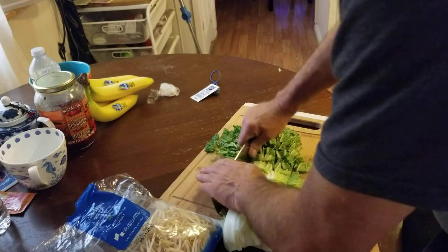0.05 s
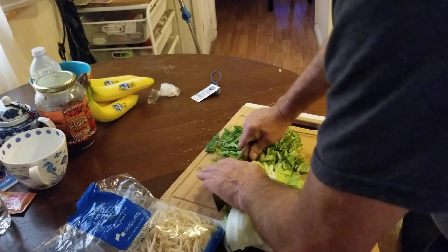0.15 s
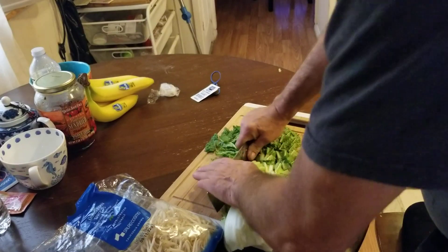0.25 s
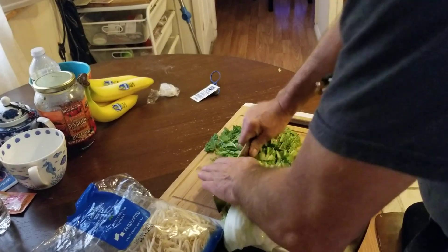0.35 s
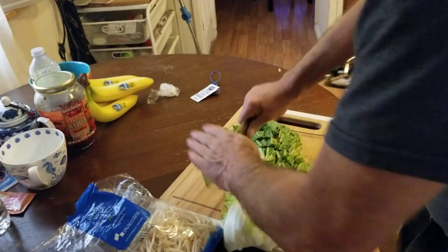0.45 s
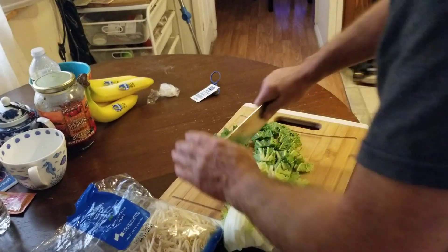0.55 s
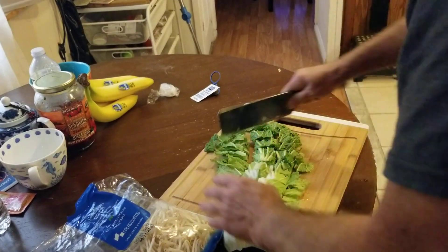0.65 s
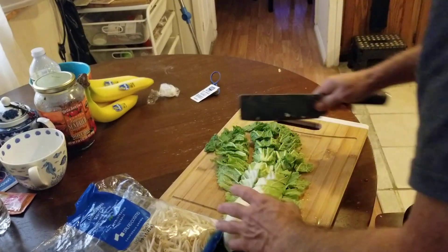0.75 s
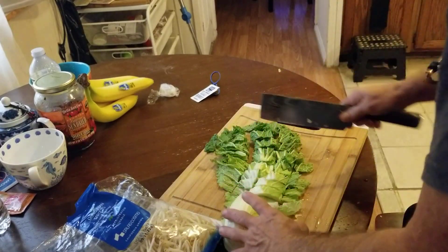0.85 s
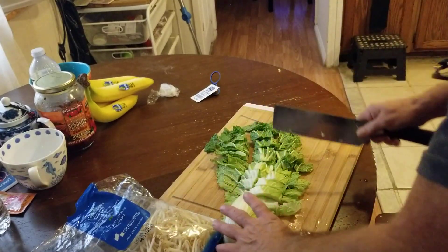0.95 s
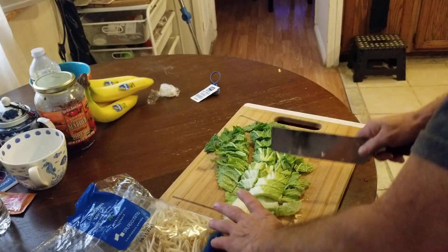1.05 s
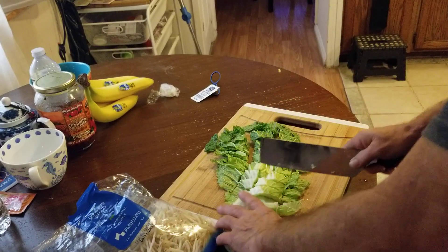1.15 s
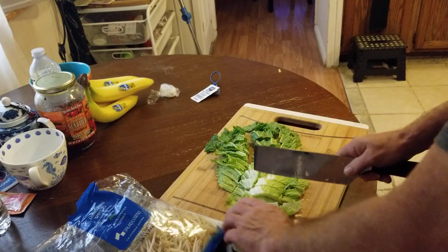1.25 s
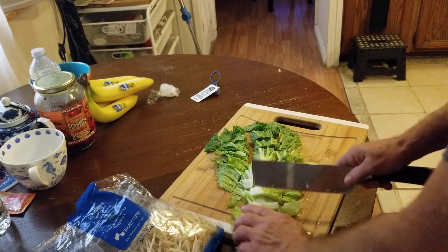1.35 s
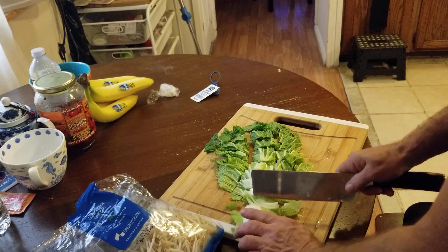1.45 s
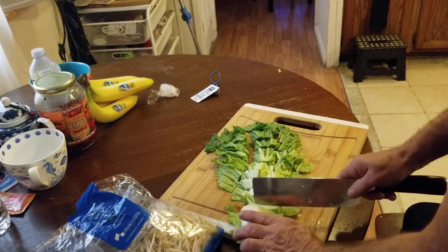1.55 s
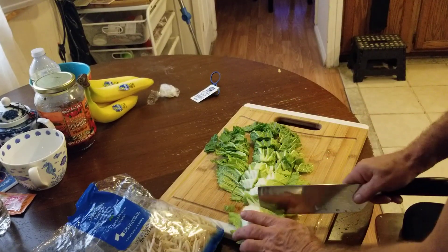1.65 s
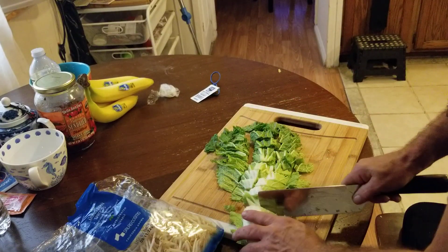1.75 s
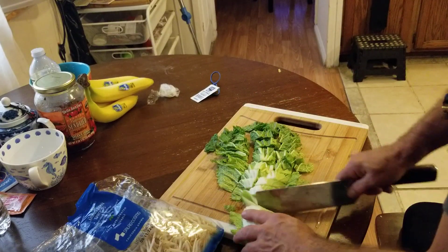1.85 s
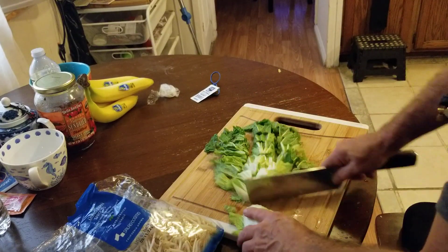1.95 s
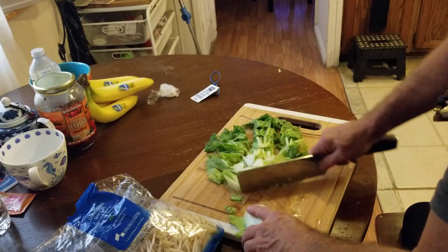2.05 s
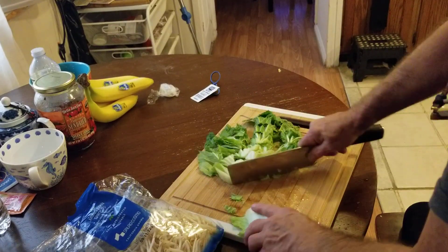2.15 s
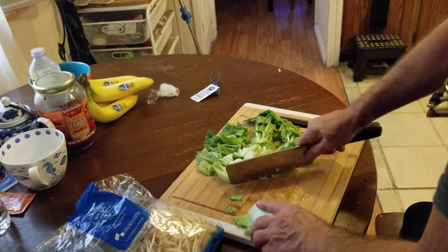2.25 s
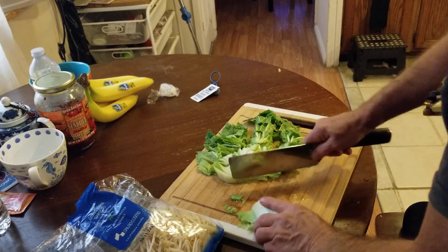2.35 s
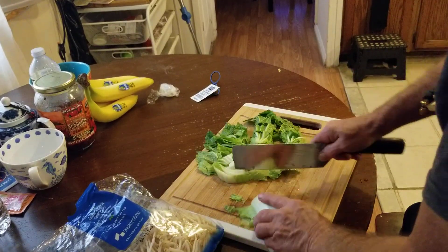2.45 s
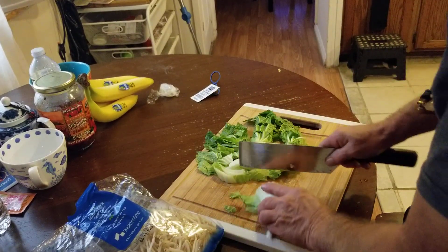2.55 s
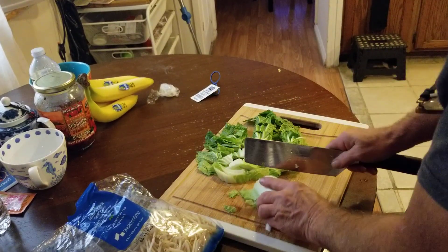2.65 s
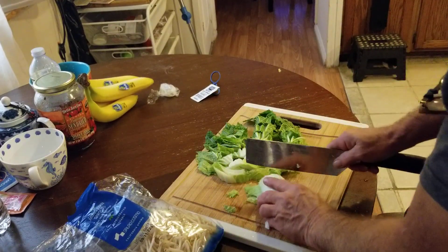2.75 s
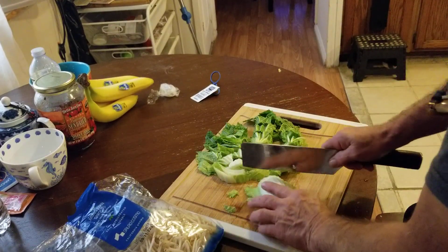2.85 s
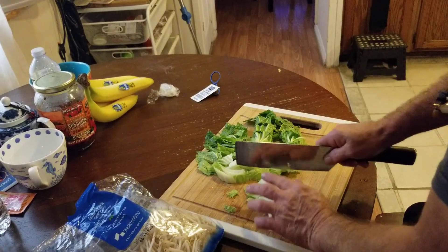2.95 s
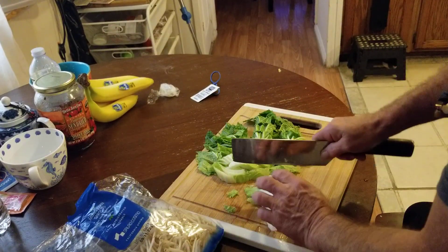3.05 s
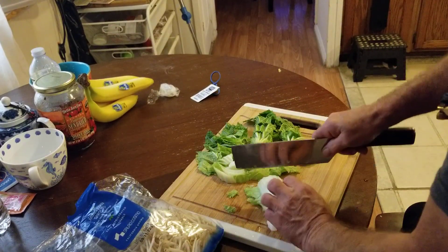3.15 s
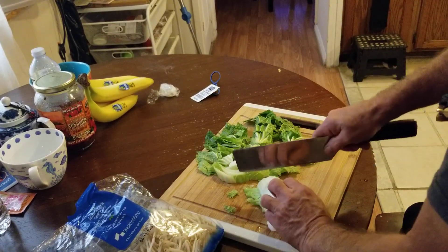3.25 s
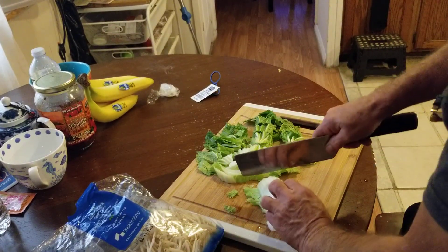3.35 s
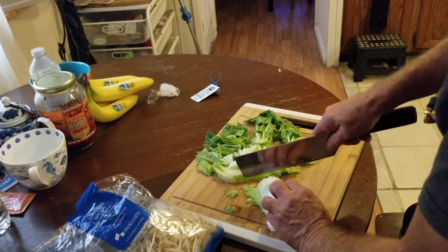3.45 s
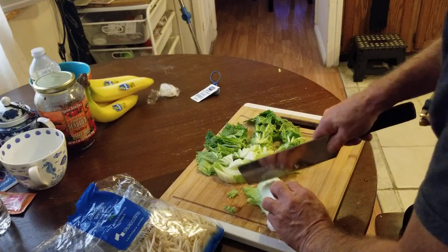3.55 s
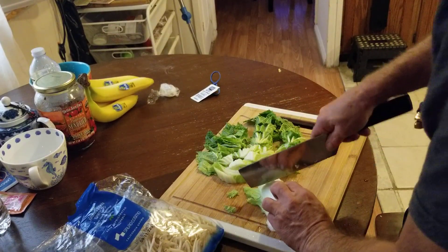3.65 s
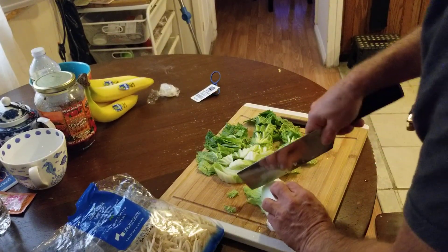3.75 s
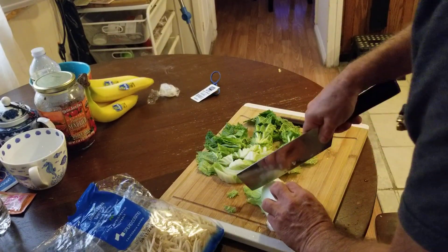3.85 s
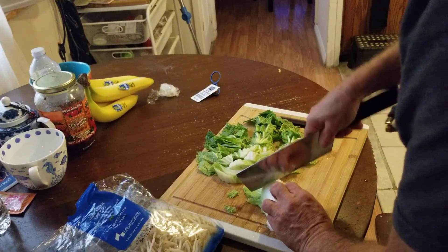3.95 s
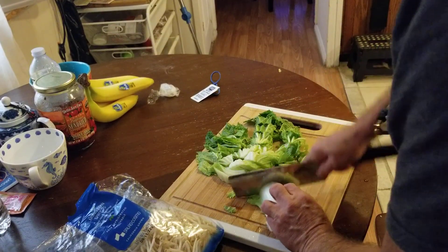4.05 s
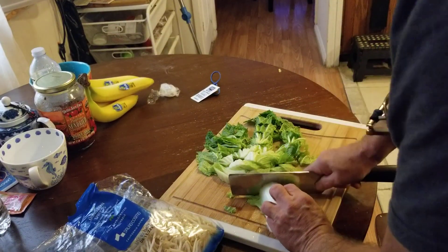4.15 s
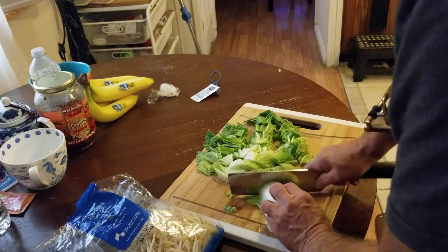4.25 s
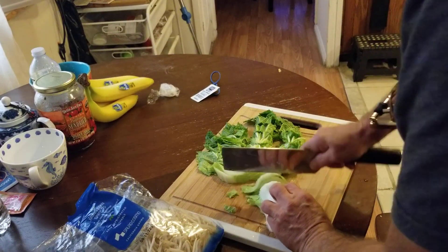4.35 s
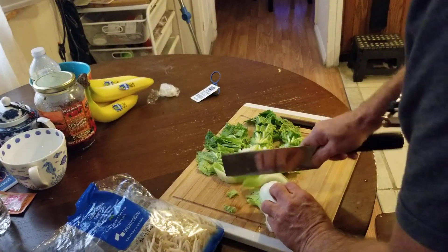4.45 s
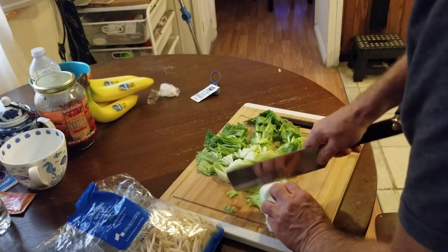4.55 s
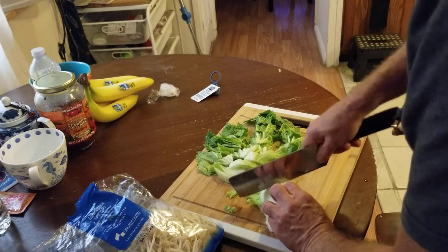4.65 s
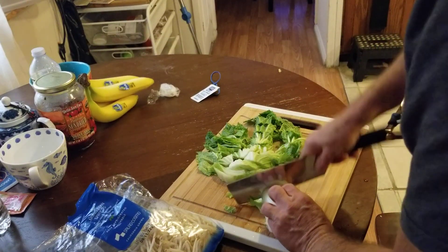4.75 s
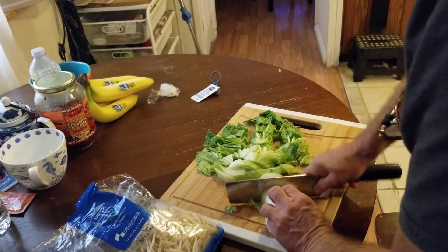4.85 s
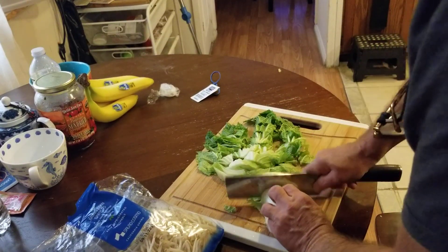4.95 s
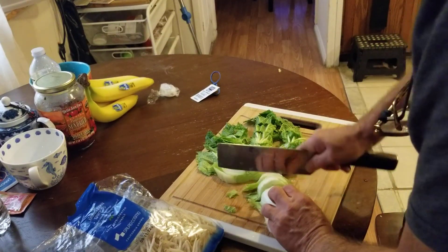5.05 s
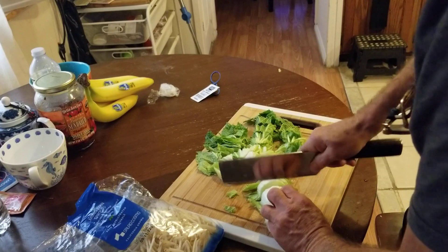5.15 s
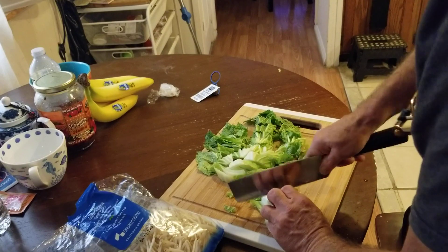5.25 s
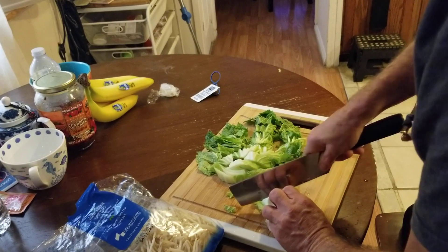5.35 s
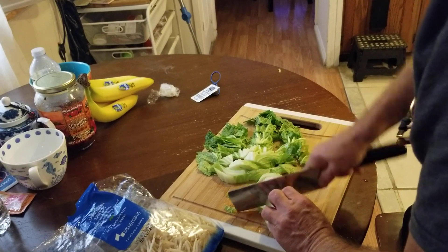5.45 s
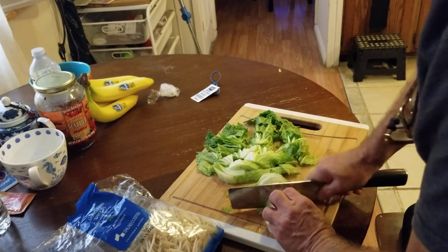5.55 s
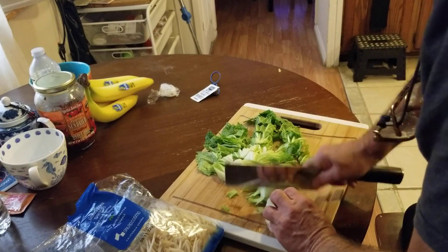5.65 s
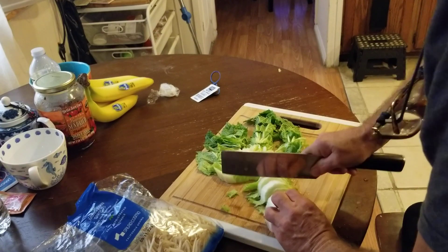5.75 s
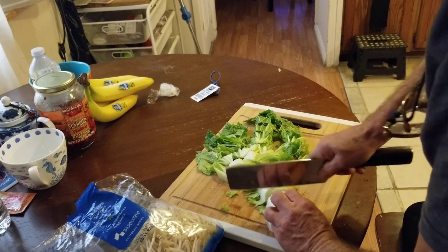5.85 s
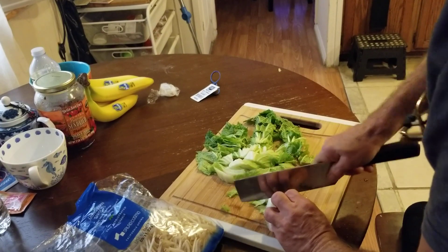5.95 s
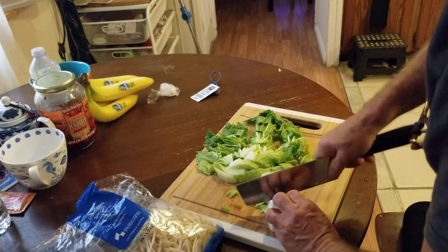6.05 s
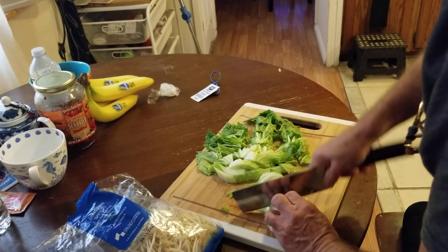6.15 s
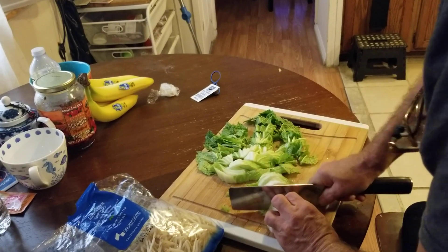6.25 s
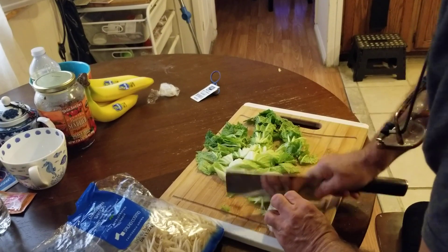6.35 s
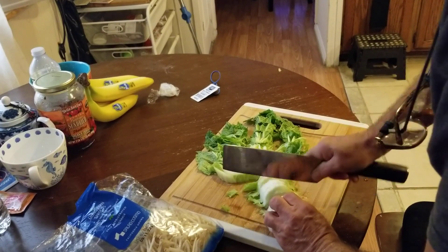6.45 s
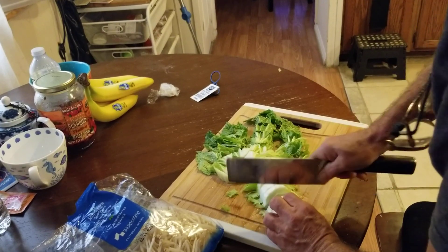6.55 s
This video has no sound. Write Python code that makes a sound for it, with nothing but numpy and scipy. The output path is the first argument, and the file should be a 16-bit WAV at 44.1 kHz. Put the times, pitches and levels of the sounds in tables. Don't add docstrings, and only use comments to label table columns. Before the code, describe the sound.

Close stereo pickup of a cleaver working through leafy cabbage on a bamboo board. A fading knock and light crunch open it, then brittle crackles and a few seconds of faint rustling, ticking and blade scraping. From about four seconds, four firm woody chops follow at uneven gaps, each with wet tearing and snapping stalk. A refrigerator hums softly in the small kitchen.

```python
import sys
import numpy as np
from scipy import signal
from scipy.fft import rfft, irfft, next_fast_len
from scipy.io import wavfile
from scipy.ndimage import uniform_filter1d

SR = 44100
rng = np.random.default_rng(int(sys.argv[2]) if len(sys.argv) > 2 else 0)


def volts_from_db(level):
    exponent = np.asarray(level, float) / 20
    return 10 ** exponent


def unload_wav(signal):
    wavfile.write(
        sys.argv[1],
        SR,
        np.round(np.clip(np.atleast_2d(signal).T, -1, 1) * 32767).astype(np.int16),
    )


N = 290619


def rms_one(x):
    return x / np.sqrt(np.mean(x ** 2) + 1e-20)


def at_hz(points, hz):
    table_hz, value = np.transpose(points)
    return np.interp(np.log(np.maximum(hz, 1)), np.log(table_hz), value)


def drift(rate_hz):
    r = np.exp(-80 * np.pi * rate_hz / SR)
    slow = signal.lfilter([1], [1, -2 * r, r * r], rng.standard_normal(N // 40 + 2002))[2000:]
    return np.interp(np.arange(N) / 40, np.arange(len(slow)), rms_one(slow))


def band(x, low_hz, high_hz):
    sos = signal.butter(2, [low_hz, min(high_hz, 19000)], "band", fs=SR, output="sos")
    return signal.sosfilt(sos, x)


def high_pass(x, order, cut_hz):
    return signal.sosfilt(signal.butter(order, cut_hz, "high", fs=SR, output="sos"), x)


def resonate(x, hz, width_hz):
    r = np.exp(-np.pi * width_hz / SR)
    poles = [1, -2 * r * np.cos(2 * np.pi * hz / SR), r * r]
    return signal.lfilter(np.array([1, 0, -1]) * (1 - r * r) / 2, poles, x + 1e-18)


def through(x, peaks, patchy_db=0):
    swell = [volts_from_db(patchy_db * drift(25.0)) if patchy_db else 1 for _ in peaks]
    total = 0
    for k, (hz, width_hz, db) in enumerate(peaks):
        total = total + (-1) ** k * volts_from_db(db) * swell[k] * resonate(x, hz, width_hz)
    return rms_one(total)


def ring(clicks, hz, t60_s):
    r, w = volts_from_db(-60 / (t60_s * SR)), 2 * np.pi * hz / SR
    return signal.lfilter([0, np.sin(w)], [1, -2 * r * np.cos(w), r * r], clicks + 1e-18)


def evened(x, window_s):
    return x / np.sqrt(uniform_filter1d(x ** 2, size=round(window_s * SR)) + 1e-12)


def grains(per_s, spread_db, clump_db):
    chance, sign = rng.random((2, N)) * SR / per_s, rng.random((2, N)) - .5
    rarity = np.minimum(-np.log(np.clip(chance, 1e-9, 1)), 5)
    return (chance < 1) * np.sign(sign) * volts_from_db(spread_db * rarity + clump_db * drift(102))


def gestures(top_s, end_s, level_db, rise, fall, from_s=-1, until_s=9):
    t = np.arange(0, N + 32, 32)[:, None] / SR
    db = level_db - rise * np.maximum(top_s - t, 0) - fall * np.maximum(t - end_s, 0)
    db = db - 9000 * np.maximum(from_s - t, 0)
    db = db - 800 * np.maximum(t - until_s, 0)
    return np.interp(np.arange(N) / SR, t[:, 0], np.sqrt(np.sum(volts_from_db(db) ** 2, axis=1)))


# f/Hz, likeness/1
LIKENESS = [(60, 0.73), (250, 0.98), (500, 0.65), (1000, 0.072), (2000, 0.026), (8000, 0.0075),
            (16000, 0.022)]


def ports(pair):
    size = next_fast_len(pair.shape[1])
    alike = np.clip(at_hz(LIKENESS, np.fft.rfftfreq(size, 1 / SR)), 0, 1)
    mid, side = rfft(pair, size) * np.sqrt([(1 + alike) / 2, (1 - alike) / 2])
    return irfft(np.array([mid + side, mid - side]), size)[:, :pair.shape[1]]


# f/Hz, density/dB
FLOOR = [(25, -40), (40, -4), (58, -6.5), (85, -3.5), (140, -10), (220, -5.5), (340, -5.5), (450, -12),
         (540, -15), (900, -16), (1300, -24.5), (1800, -29), (3000, -71)]
# f/Hz, density/dB
HISS = [(1180, -50), (2000, -3), (2300, -10), (2490, 2), (3210, -15.5), (3860, -8.5), (5380, -6.5),
        (6130, -14.5), (7500, -18), (8400, -27.5), (11900, -7.5), (15100, -9.5), (16200, -14)]
# f/Hz, width/Hz, rms/dB
DRONE = [(210.2, 4.9, -61), (239.1, 1.4, -68.5), (346.3, 6.3, -62), (449.5, 22, -64)]
# f/Hz, rms/dB
HUM = [(54.5, -61.5), (60, -55.5), (120, -61)]


def background():
    hz, t = np.fft.rfftfreq(N, 1 / SR), np.arange(N) / SR
    air = rms_one(irfft(rfft(rng.standard_normal((2, N))) * volts_from_db(at_hz(FLOOR, hz)), N))
    hiss = rms_one(irfft(rfft(rng.standard_normal((2, N))) * volts_from_db(at_hz(HISS, hz)), N))
    out = volts_from_db(-55 + 1.8 * drift(3.9)) * air + volts_from_db(-70.5 + 1.2 * drift(0.97)) * hiss
    for f, width_hz, db in DRONE:
        out += volts_from_db(db) * rms_one(resonate(rng.standard_normal((2, N)), f, width_hz))
    for f, db in HUM:
        out[0] += volts_from_db(db - 3.0 + 2.1 * drift(6.4)) * np.sin(2 * np.pi * f * t + 1.9 * drift(0.38))
    return 0.75 * np.sqrt(2) * ports(out)


# f/Hz, t60/s
ROOM_T60 = [(125, 0.8), (500, 0.32), (2000, 0.33), (8000, 0.15), (16000, 0.19)]


def kitchen(x):
    t = np.arange(round(.7 * SR)) / SR
    edges_hz, tail = 88 * 2. ** np.arange(9), 0
    for low, high in zip(edges_hz, np.minimum(edges_hz[1:], 19000)):
        noise = band(rng.standard_normal((2, len(t))), low, high)
        tail = tail + noise * volts_from_db(-60 * t / at_hz(ROOM_T60, np.sqrt(low * high)))
    tail = ports(tail * np.clip(t / 0.017, 0, 1))
    return signal.fftconvolve(x[None], tail / np.sqrt(np.sum(tail ** 2) / 2))[:, :N]


# start/s, end/s, f/Hz, width/Hz, level/dB
DRAGS = [(1.62, 1.76, 1930, 140, -68), (1.865, 2.14, 4000, 180, -63.5), (1.93, 2.18, 2660, 740, -62.5),
         (2.312, 2.5, 1800, 610, -61.5), (2.5, 2.72, 1700, 480, -66.5), (2.747, 2.775, 3140, 860, -60.5),
         (1.5365, 1.541, 4200, 270, -45.5), (1.545, 1.56, 4400, 770, -58), (5.972, 5.98, 4800, 300, -67),
         (5.984, 5.996, 4300, 400, -65), (5.93, 5.965, 2900, 430, -73), (5.925, 5.93, 4400, 440, -69),
         (5.391, 5.4, 1540, 390, -31.5), (2.791, 2.86, 3500, 910, -64.5), (2.909, 2.96, 3500, 770, -65.5),
         (4.072, 4.115, 1570, 330, -40), (4.791, 4.834, 1370, 470, -34.5), (5.51, 5.607, 2370, 1100, -35.5),
         (2.76, 2.85, 510, 190, -55.5), (1.01, 1.087, 440, 150, -58.5)]


def drags():
    slips, out = grains(5000, spread_db=3.0, clump_db=1.0), np.zeros((2, N))
    for start, end, hz, width_hz, db in DRAGS:
        i, j = round(start * SR), round(end * SR)
        swell = np.sqrt(np.sin(np.pi * np.linspace(0, 1, j - i) ** 0.35))
        sung = resonate(resonate(slips[:, i:j], hz, width_hz), hz, 2 * width_hz)
        out[:, i:j] += volts_from_db(db) * swell * rms_one(sung)
    return out


# enters/s, through/s, crunch/dB, juice above it/dB, dying/(dB/s)
CUTS = [(0.089, 0.096, -44, -2.5, 137), (1.134, 1.198, -46.5, 0.5, 200), (1.224, 1.251, -47.5, 5, 180),
        (3.992, 3.997, -38.5, -1, 300), (4.006, 4.048, -33.5, -9, 202), (4.058, 4.113, -37, -3, 163),
        (4.733, 4.832, -32, -6.5, 500), (4.837, 4.862, -33, -6, 180), (5.387, 5.426, -32.5, -10, 400),
        (5.443, 5.526, -32.5, -4.5, 171), (6.124, 6.146, -28, -12.5, 500), (6.173, 6.224, -37, -4.5, 147)]
# t/s, crunch/dB, dying/(dB/s), juice above it/dB, fine hiss above it/dB
TOUCHES = [(0.0, -46.5, 2500, -13, -11), (0.258, -49.5, 152, -12, -23), (0.353, -55, 164, -10.5, -16),
           (1.533, -57.5, 300, -3, 4), (1.625, -63.5, 73, -4, 1.5), (2.316, -60, 156, -3.5, -4),
           (2.746, -52, 104, -33, -33), (2.795, -50, 172, -33, -15), (2.911, -53, 151, -37, -28),
           (3.118, -81, 25, -17, -13), (3.576, -66.5, 200, 12.5, 10), (3.6, -64.5, 46, 2, 5.5),
           (4.58, -56, 250, 5, 5.5), (4.6, -59.5, 106, -2, 0), (5.258, -61, 350, 13.5, 17),
           (5.3, -67.5, 66, 9, 3), (5.7, -57.5, 231.5, -16.5, -36.5), (5.923, -65, 108, 2.5, 9),
           (5.991, -62.5, 90, 0, -4)]
# loudest t/s, crunch/dB, swelling/(dB/s), juice above it/dB, fine hiss above it/dB
RUSTLES = [(0.083, -49.5, 700, -2, 6.5), (1.14, -49, 192, -6.5, -12), (1.4, -64.5, 116, -8, -16),
           (1.73, -64, 147, -0.5, -15), (1.834, -62, 132, -27, -25), (1.895, -67.5, 350, 2.5, 0),
           (1.94, -63, 207, 10, 8), (1.99, -59, 166, 8, 7), (2.06, -58, 134, 3, 0),
           (2.14, -63.5, 130, 4.5, 2.5), (2.21, -58, 200, -23, -15), (2.457, -64.5, 153, -12, -3),
           (2.536, -56.5, 113, -5.5, -8.5), (3.89, -71, 300, -6, -8), (3.98, -60.5, 133, -1.5, 1),
           (4.732, -48.5, 600, 0, 2), (5.08, -68, 150, -1.5, 3), (5.17, -74, 100, -2, 9),
           (5.39, -49, 800, -13, 0), (6.13, -55.5, 900, 12, 15), (6.45, -78, 99, -4, 10)]


def leaf_levels():
    spray_rise = 5000
    enter, done, db, wet_db, dying = np.transpose(CUTS)
    torn = np.minimum(enter + 0.016, done)
    juice_db = db + wet_db
    crunch = gestures(torn, done, db, 900, dying, from_s=enter)
    juice = gestures(enter, done, juice_db, spray_rise, 1.1 * dying)
    fine = gestures(enter, done, juice_db - 3.5, spray_rise, 2.1 * dying)
    power = np.array([crunch, juice, fine]) ** 2
    power[2] += gestures(enter, enter, juice_db - 1, spray_rise, 156) ** 2
    s, db, dying, juice_db, fine_db = np.transpose(TOUCHES)
    power += [gestures(s, s, db + more_db, 29000, dying) ** 2 for more_db in (0, juice_db, fine_db)]
    s, db, swelling, juice_db, fine_db = np.transpose(RUSTLES)
    power += [gestures(s, s, db + more_db, swelling, swelling) ** 2 for more_db in (0, juice_db, fine_db)]
    return np.sqrt(power)


# f/Hz, width/Hz, level/dB
STALK = [(870, 284, -4), (1210, 384, -3.5), (1650, 446, -2), (1990, 394, -2), (2700, 900, -8.5)]
# f/Hz, width/Hz, level/dB
JUICE = [(3840, 2500, 0), (5620, 1320, 5.5), (6320, 1120, 4), (8380, 1170, -6.5)]
# f/Hz, width/Hz, level/dB
FINE = [(11030, 4100, -1), (13000, 2100, 1), (14970, 420, 1.5)]


def leaves():
    tears = grains(5000, spread_db=3.0, clump_db=2.2)
    spray = 0.3 * tears + 3.2 * grains(12000, spread_db=2.5, clump_db=1.5)
    crunch = through(band(tears, 580, 3470), STALK, patchy_db=0.6)
    juice = through(band(spray, 1400, 7700), JUICE, patchy_db=0.8)
    fine = through(band(spray, 7950, 15900), FINE)
    crunch_gain, juice_gain, fine_gain = leaf_levels()
    return volts_from_db(-2.0) * (crunch_gain * crunch + juice_gain * juice + fine_gain * fine)


# t/s, peak/dB, f/Hz, top end above it/dB
TICKS = [(0.2605, -40.5, 820, -42.5), (0.3542, -47, 1240, -6), (1.0281, -51, 700, -14),
         (1.0695, -53, 1650, 5), (1.0905, -43, 2000, -6), (1.6254, -52, 1970, 3), (1.7417, -53, 2020, 0),
         (1.802, -51, 1310, -27), (2.21, -59, 974, -13), (2.3151, -38.5, 1790, -13),
         (2.4399, -48, 1910, -18), (2.4782, -47, 1640, -16), (3.5765, -45.5, 1650, 0),
         (3.7122, -53, 956, 3), (3.755, -56, 1050, 2), (4.581, -58, 1550, -18), (5.2614, -60, 980, -3),
         (5.925, -56.5, 1590, 7)]
# t/s, peak/dB, f/Hz, top end above it/dB
SNAPS = [(0.082, -43, 1160, 3), (0.0983, -31, 1130, -1), (1.2632, -43, 1790, 11.5), (3.9918, -35, 2300, 3),
         (4.076, -27, 1470, -20), (4.136, -28, 1940, -20), (4.734, -33, 1810, -10), (4.7654, -28, 920, -22),
         (4.799, -19, 2100, -32), (4.808, -36, 1900, -18), (4.827, -35, 1690, -20),
         (4.865, -26.5, 1550, -3), (5.3933, -31, 1510, 0.5), (5.4822, -25, 1490, -7),
         (5.5294, -17.5, 920, -24), (6.182, -22, 1640, -6), (6.2436, -33, 1000, -2)]


def snaps():
    span = round(.06 * SR)
    t, out = np.arange(span) / SR, np.zeros((2, N))
    for s, peak_db, hz, top_db in TICKS + SNAPS:
        puff = rng.standard_normal((2, span))
        t60_s = 0.026 * (hz / 1000) ** -0.31
        tone = resonate(puff * volts_from_db(-60 * t / 0.016), hz, 5.1 / t60_s)
        crack = (through(puff, JUICE) + through(puff, FINE)) * volts_from_db(-60 * t / (0.68 * t60_s))
        tone = tone / np.abs(tone).max(1)[:, None]
        crack = crack / np.abs(crack).max(1)[:, None]
        i = round(s * SR)
        out[:, i:i + span] += volts_from_db(peak_db) * (tone + volts_from_db(top_db + 5.0) * crack)[:, :N - i]
    return out


# t/s, level/dB, f/Hz, upper f/Hz, upper level/dB
CRACKS = [
    (4.8446, -10, 1360, 4560, -39),
    (4.8465, -17.5, 1430, 2300, -26),
    (4.8495, -16, 1600, 2480, -25),
    (5.4456, -19, 1860, 5260, -16.5),
    (5.515, -14, 1500, 4440, -18.5),
    (6.1777, -30, 2010, 5240, -25.5),
]
# t/s, level/dB, f/Hz, second f/Hz, second level/dB
CLICKS = [(0.0932, -39, 2500, 4500, -35), (0.0998, -37, 1520, 4670, -48), (0.1035, -34, 1990, 3170, -30),
          (1.028, -46, 696, 1500, -67), (1.1195, -34, 1900, 5500, -42), (1.1368, -37, 2100, 5500, -40),
          (1.1462, -36, 2240, 3800, -40), (1.1482, -32, 1700, 5800, -32), (1.1565, -36, 2500, 4000, -44),
          (1.1625, -30, 2300, 3600, -35), (1.1803, -29, 1170, 6500, -36), (1.1862, -40, 1300, 7000, -33),
          (1.189, -35, 5500, 9500, -40), (1.1918, -27, 3300, 1000, -34), (1.1975, -35, 3000, 1500, -40),
          (1.2025, -34, 7200, 2500, -42), (1.2258, -29, 3300, 8000, -35), (1.232, -31, 2070, 4200, -32),
          (1.2335, -32, 1300, 4400, -36), (1.245, -33, 4300, 2000, -44), (1.258, -30.5, 3000, 5000, -44),
          (1.265, -30, 2590, 7200, -29), (1.5333, -36.5, 1390, 4800, -38), (1.5336, -44, 9600, 12000, -39),
          (1.6252, -52, 2000, 5000, -55), (2.7476, -43, 895, 4000, -53), (2.7962, -42, 1010, 3320, -46),
          (2.7995, -55, 2000, 3800, -54), (2.836, -46, 1500, 3000, -56), (2.9098, -44, 895, 4000, -51),
          (3.115, -58, 1490, 4000, -63), (3.5765, -43, 11500, 14500, -42), (3.9927, -30, 5300, 11500, -26),
          (3.9955, -30, 10000, 15000, -30), (3.9963, -30, 12500, 8000, -36),
          (4.584, -41, 11500, 14500, -42), (5.262, -42, 11500, 14500, -44), (5.9238, -57, 4400, 11500, -46)]
# t/s, level/dB, f/Hz, second f/Hz, second level/dB
VEINS = [(1.2408, -23, 6640, 8200, -29), (4.0098, -26.5, 1250, 2620, -26), (4.0148, -30, 1080, 2400, -26),
         (4.0235, -30, 2200, 900, -27), (4.0725, -27, 1460, 2300, -33), (4.0838, -23, 1640, 2400, -43),
         (4.0905, -27, 1610, 2100, -37), (4.0965, -32, 1870, 1300, -36), (4.1025, -42, 1260, 2300, -36),
         (4.109, -31, 1410, 2200, -37), (4.132, -33, 915, 2640, -29), (4.1455, -31, 600, 1960, -30.5),
         (4.8175, -24, 1650, 900, -39), (4.8275, -20.5, 1650, 2400, -41), (4.853, -23.5, 720, 2440, -19.5),
         (4.859, -30, 800, 2200, -30), (4.876, -25, 1490, 2400, -39), (5.484, -28, 1490, 2800, -36),
         (5.5195, -19.5, 2410, 895, -16.5), (6.1395, -17, 1206, 2340, -32), (6.1605, -19.5, 834, 1480, -26),
         (6.172, -23, 1750, 900, -35), (6.187, -24, 1550, 2600, -30), (6.2025, -26, 1580, 900, -37),
         (6.2235, -38, 1600, 2300, -41), (6.229, -34, 1700, 900, -39), (6.242, -36, 1650, 3570, -32.5)]


def cracks(rows, cycles):
    out, click = np.zeros(N), np.arange(2000) == 0
    for s, low_db, low_hz, high_hz, high_db in rows:
        i, t60_s = round(s * SR), cycles / low_hz
        low = volts_from_db(low_db) * ring(click, low_hz, t60_s)
        high = volts_from_db(high_db) * ring(click, high_hz, min(.5 * t60_s, 2 * cycles / high_hz))
        out[i:i + len(click)] += low + high
    out = high_pass(out, 2, 480)
    return np.array([out, 0.4 * np.roll(out, 4)]) * np.sqrt(2)


# t/s, lowest mode/dB, its dying/(dB/s), higher modes above/dB, their dying/(dB/s)
SHAKES = [(0.0, -41.5, 254, 8.5, 300), (0.107, -41.5, 300, 9, 348), (0.174, -49, 900, 9.5, 900),
          (1.14, -60.5, 800, 10.5, 600), (1.239, -57, 500, -6, 600), (4.045, -42, 149, 15, 187),
          (4.078, -33.5, 900, 1.5, 300), (4.131, -33.5, 332, 0.5, 600), (4.783, -40.5, 300, 15, 300),
          (4.848, -50, 100, 24.5, 200), (4.882, -41, 500, 7.5, 350), (5.426, -42, 372, 21.5, 300),
          (5.47, -34.5, 60, -0.5, 58), (5.524, -28, 600, 2, 400), (6.172, -39, 60, 11.5, 86),
          (6.208, -34, 200, 1.5, 80), (6.243, -42.5, 60, 13.5, 80), (6.258, -34, 600, 3, 400)]
# f/Hz, level/dB, t60/s, way
PRESSED = (344, -16, 0.15, 1)
SHAKE_RISE, BEND_LAG_S = 790, 0.0078


def judder(pushes):
    s, low_db, low_dying, upper_db, upper_dying = np.transpose(SHAKES)
    until_s = np.append(s[1:], N / SR)
    low_top_s, upper_top_s = s + BEND_LAG_S, s + 0.0023
    bend = gestures(low_top_s, low_top_s + 0.037, low_db, SHAKE_RISE, low_dying, s, until_s)
    shake = gestures(upper_top_s, upper_top_s + 0.0033, low_db + upper_db, SHAKE_RISE, upper_dying, s, until_s)
    low = evened(ring(pushes[0], 238, 0.65), 0.08)
    modes = [volts_from_db(db) * ring(pushes[1], hz, t60_s * 0.5) for hz, db, t60_s, _ in BOARD[3:13] + [PRESSED]]
    return volts_from_db(-3) * (bend * low + shake * evened(sum(modes), 0.0267))


def table_rock(pushes):
    blow, blow_db, _, slow_db, _ = np.transpose(THUDS)
    rock = evened(ring(pushes[1], 95.0, 0.11), 0.22)
    rock = rock + volts_from_db(7.0) * evened(ring(pushes[0], 149, 0.54), 0.077)
    level_db = blow_db + 2 * slow_db - 55.5
    return gestures(blow + BEND_LAG_S, blow + 0.03, level_db, SHAKE_RISE, 140, blow) * rock


# f/Hz, level/dB, t60/s, way (1 toward, -1 away)
BOARD = [(157, -15.5, 0.024, -1), (231, -24, 0.375, -1), (260, -30, 0.107, 1), (320, -14, 0.029, -1),
         (370, -15, 0.044, 1), (393, -24, 0.225, 1), (429, -18.5, 0.166, -1), (1230, -25, 0.04, -1),
         (523, -23.5, 0.115, -1), (581, -25, 0.095, -1), (625, -27, 0.175, 1), (686, -23, 0.059, -1),
         (733, -17, 0.04, 1), (887, -28, 0.19, 1)]
# t/s, level/dB, stifling by resting blade/(dB/s), slow modes/dB, modes over 500 Hz/dB
THUDS = [
    (-0.0115, -14.5, 200, 0, -3),
    (0.107, -22, 100, 0, -10),
    (4.0094, -6.5, 50, 6.5, -1),
    (4.7495, -0.5, 200, 0, 0),
    (5.4001, 0.5, 350, -1, 0),
    (5.523, -14, 100, 0, 0),
    (6.1334, 4, 330, -4.5, 2),
]


def thuds():
    span = round(.4 * SR)
    t = np.arange(span) / SR
    out = np.zeros(N + 2 * span)
    push = signal.lfilter(*signal.butter(2, 800, fs=SR), np.arange(span) == 0)
    dent = volts_from_db(-21) * push / push.max()
    modes = [way * volts_from_db(db) * ring(push, hz, t60_s) for hz, db, t60_s, way in BOARD]
    bend_hz, _, bend_t60_s, _ = BOARD[1]
    coupled = volts_from_db(-68) * ring(ring(push, bend_hz, bend_t60_s), 230, 0.08)
    for s, db, stifle, slow_db, high_db in THUDS:
        body = volts_from_db(slow_db) * coupled - dent
        for (hz, _, t60_s, _), mode in zip(BOARD, modes):
            place_db = slow_db if t60_s > .2 else high_db if hz > 500 else 0
            body = body + volts_from_db(place_db) * mode
        i = round(s * SR) + span
        out[i:i + span] += volts_from_db(db - stifle * np.maximum(t - 0.045, 0)) * body
    return out[span:span + N]


def scene():
    airborne = leaves() + snaps() + drags()
    airborne = airborne + cracks(CRACKS, 12) + cracks(CLICKS, 9.0) + cracks(VEINS, 20.0)
    pushes = grains(900, spread_db=-2.0, clump_db=-2.5)
    board = high_pass(judder(pushes) + thuds(), 4, 187)
    off_table = 0.76 * np.roll(band(board, 220, 4000), round(0.00215 * SR))
    pan = volts_from_db(-0.4 * np.array([[.5], [-.5]]))
    near = ports(airborne) + pan * ports(np.array([board, off_table]))
    echo = volts_from_db(-10) * kitchen(band(board, 710, 9000) + airborne[0])
    return near + echo + table_rock(pushes) + background()


def band_limit(x):
    return signal.sosfilt(signal.butter(12, 15700, fs=SR, output="sos"), x)


# f/Hz, left over right/dB
TILT = [(60, 1.5), (150, 1.5), (300, 2), (600, 1.5), (1000, 1.5), (2500, 0.5), (4500, -4.5), (8000, 4),
        (13000, 2)]


def record(dry):
    tilt_db = at_hz(TILT, np.fft.rfftfreq(N, 1 / SR)) / 2
    x = irfft(rfft(dry) * volts_from_db(np.array([tilt_db, -tilt_db])), N)
    x = signal.sosfilt(signal.cheby2(10, 45, 17200, fs=SR, output="sos"), x)
    return band_limit(x)


dry = scene()
out = record(dry)
unload_wav(out)
```